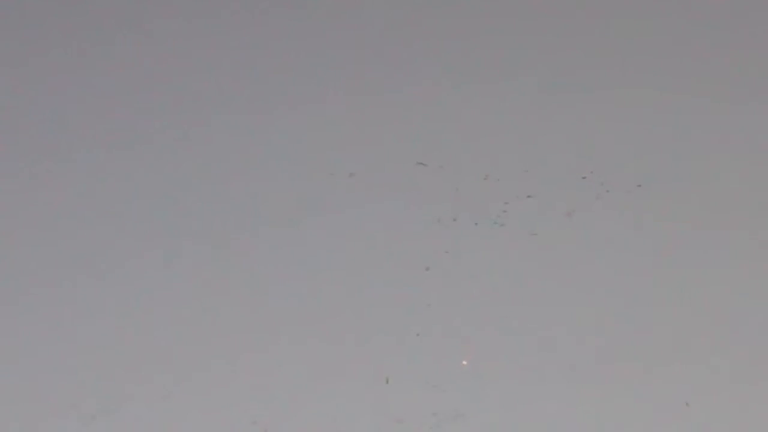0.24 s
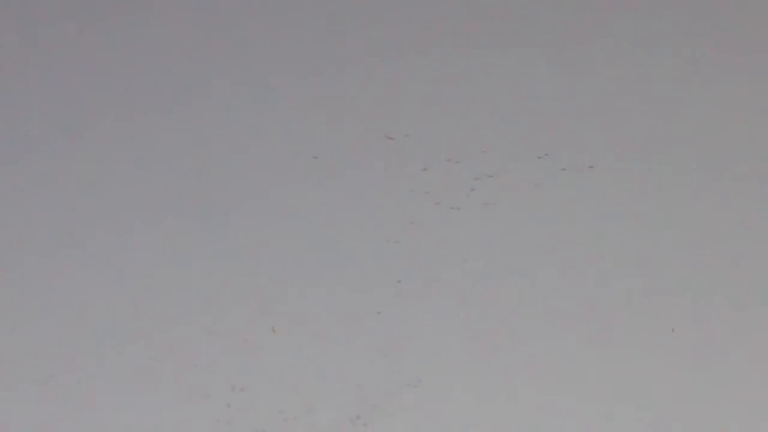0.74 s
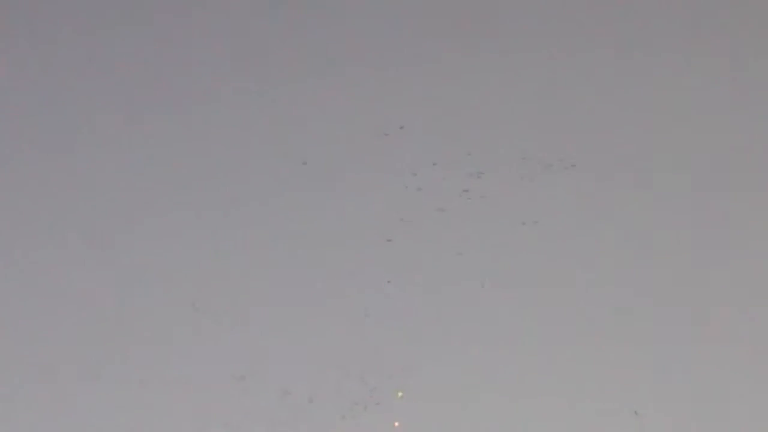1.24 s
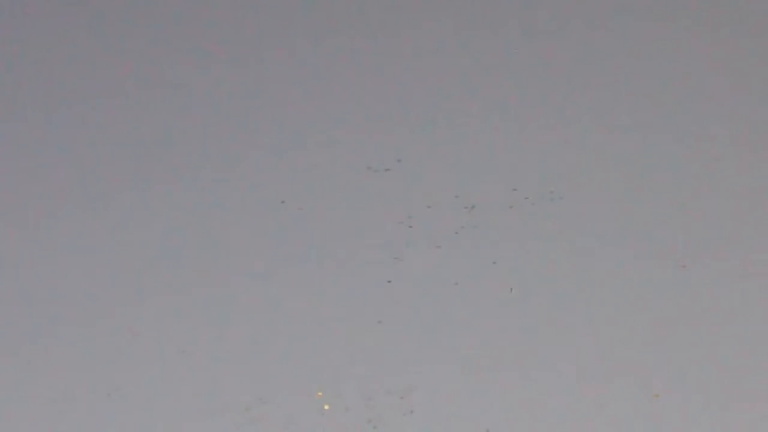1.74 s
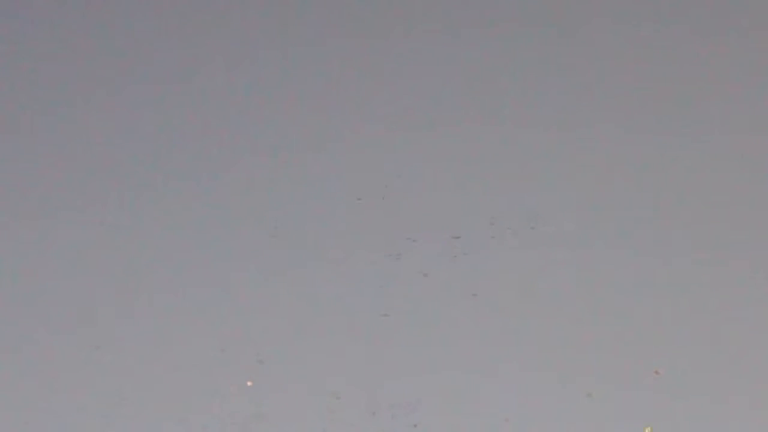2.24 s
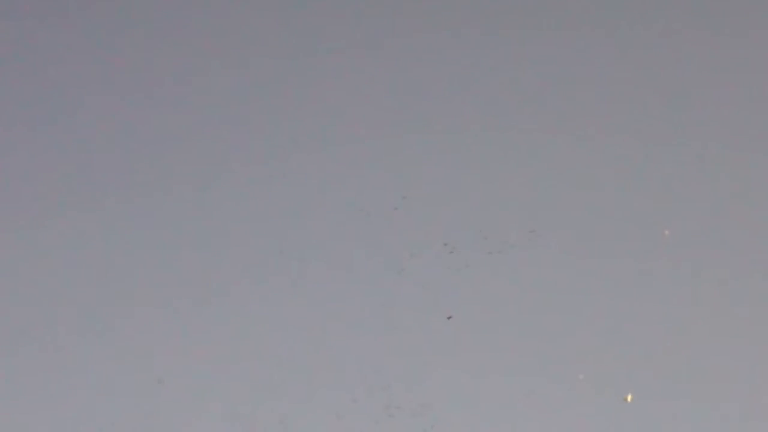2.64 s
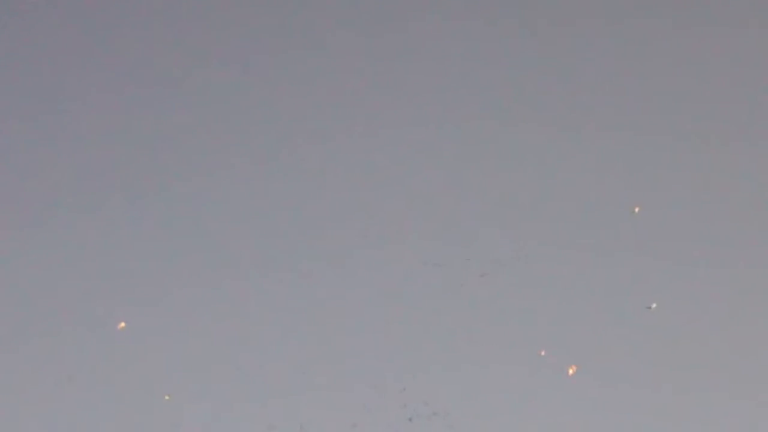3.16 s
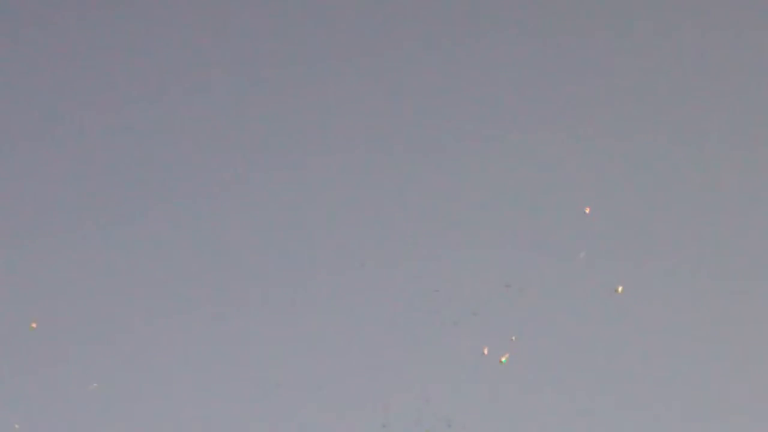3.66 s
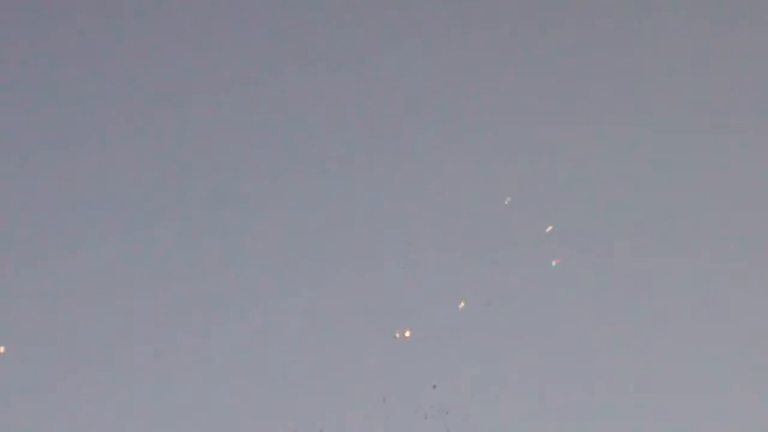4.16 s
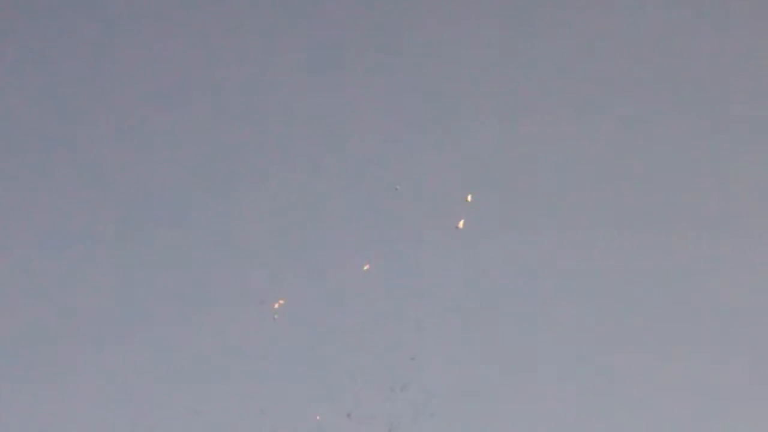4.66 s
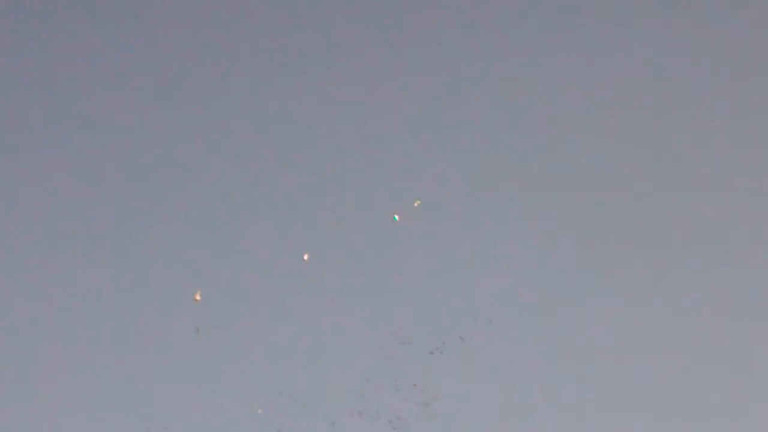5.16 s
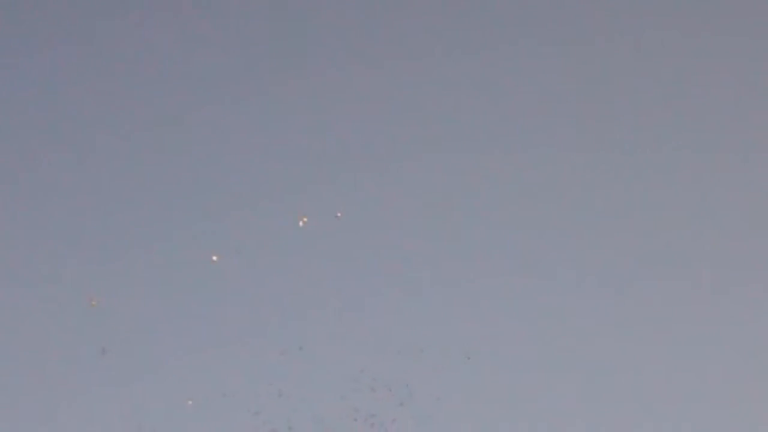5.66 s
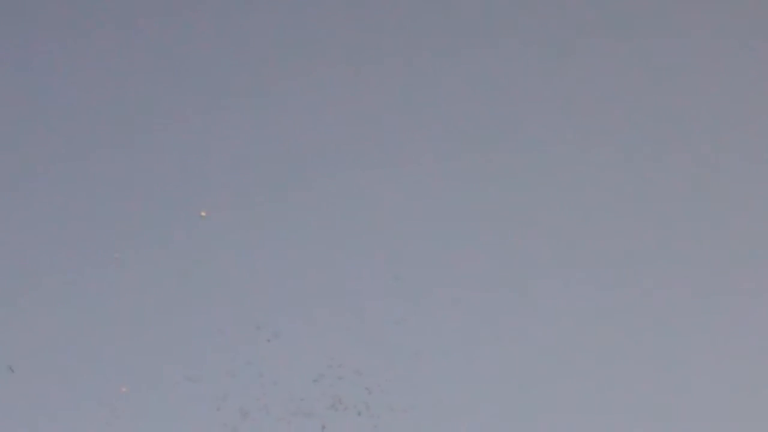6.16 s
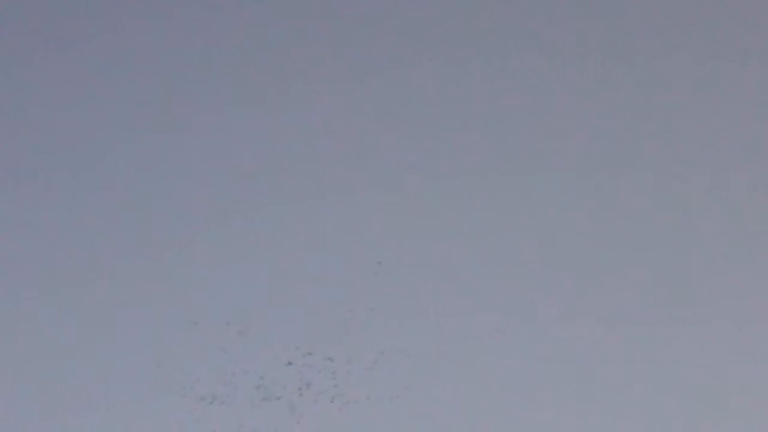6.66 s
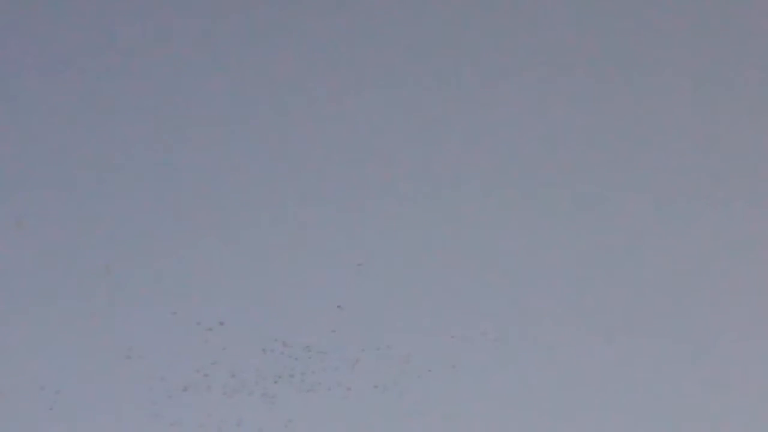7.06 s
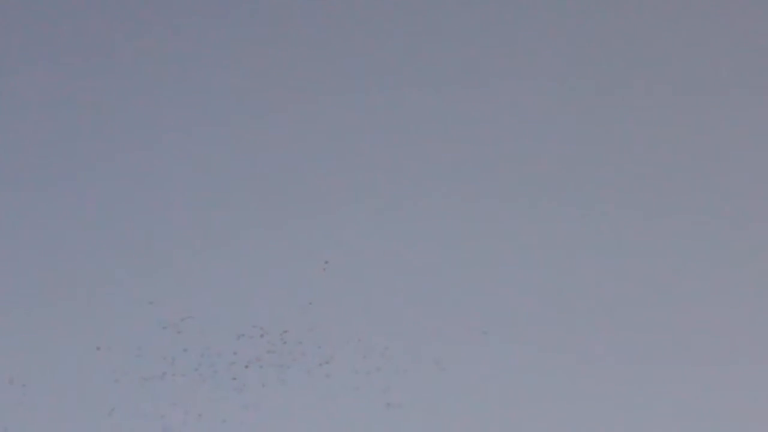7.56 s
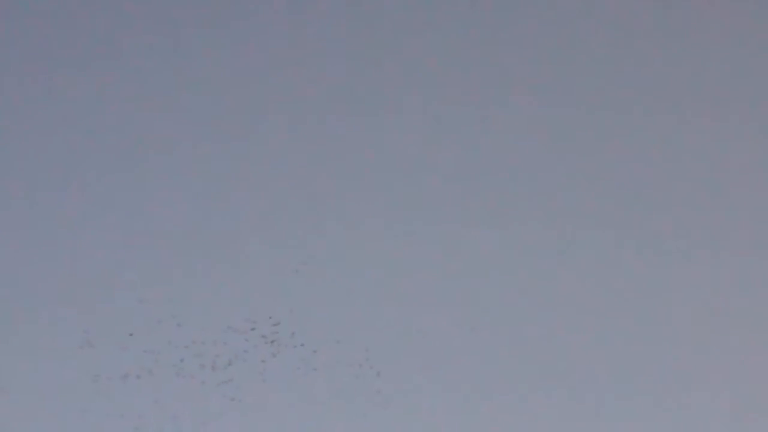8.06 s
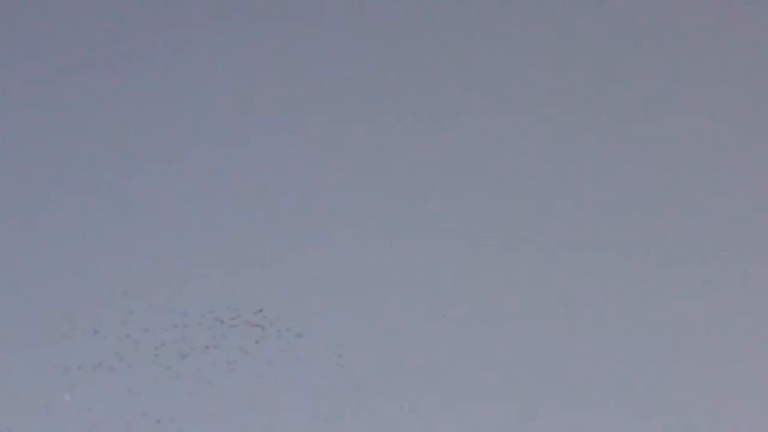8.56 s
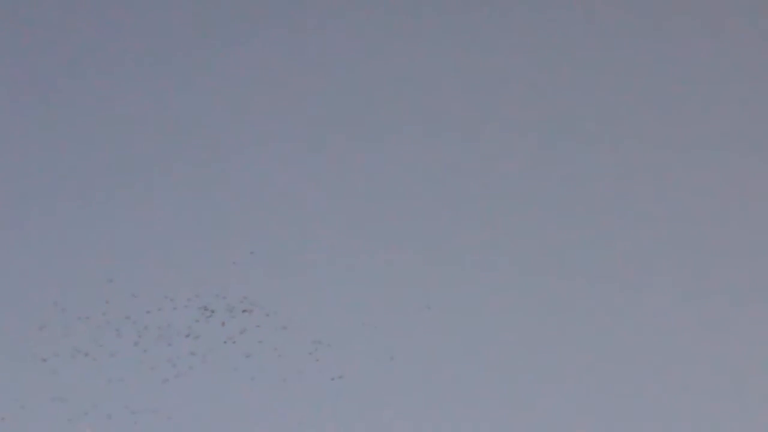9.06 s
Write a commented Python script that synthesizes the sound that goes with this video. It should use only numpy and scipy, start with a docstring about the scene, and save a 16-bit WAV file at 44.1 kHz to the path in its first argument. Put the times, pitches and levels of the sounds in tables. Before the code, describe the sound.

Outdoors, many crow-like birds call at once in flight, far away, with a few closer ones standing out in bright, rasping clacks. Short, high gull cries are scattered among them, busiest in the first half. The closer clacks then bunch up, and the chatter dips and returns. Soft distant traffic and a thin microphone hiss lie underneath, and the birds have a slight echo.

```python
"""Dusk over open ground. Distant traffic, microphone hiss and a far jackdaw flock sound throughout.
From 0.2 s gulls wail in clear notes that break between registers, the beak picking out harmonics.
From 0.4 s near jackdaws call 'tchack': a bright tone, then falling pulses that collapse into a rasp.
A thin far squeal sounds twice between 2 and 3 s. The near jackdaws crowd in around 7 s; a faint hum
follows at 7.8 s. Trees and walls echo the birds."""
import sys
import numpy as np
from scipy import signal
from scipy.fft import rfft, irfft, next_fast_len
from scipy.io import wavfile
from scipy.ndimage import map_coordinates

SR = 44100
rng = np.random.default_rng(int(sys.argv[2]) if len(sys.argv) > 2 else 0)


def bounce(signal):
    """Save signal as a 16-bit WAV file at the path given by the first command-line argument."""
    frames = np.transpose(np.atleast_2d(signal))
    limited = np.clip(frames, -1, 1)
    pcm = np.round(limited * 32767).astype(np.int16)
    wavfile.write(sys.argv[1], SR, pcm)


N = 410571

# traffic and air spectrum: freq_hz, relative_db
TRAFFIC_SPECTRUM = [(20, -17), (50, -5.5), (80, 1), (125, -5.5), (190, -5), (280, -1), (400, -5.5),
                    (600, -2.5), (1000, -3), (1600, -10.5), (2500, -16), (8000, -17.5)]
# left-right likeness of the traffic: freq_hz, coherence
TRAFFIC_COHERENCE = [(50, 1), (150, 0.85), (700, 0.82), (2000, 0.58), (6000, 0.014)]
# microphone hiss spectrum: freq_hz, relative_db
HISS_SPECTRUM = [(200, -47), (6000, -29), (9000, -1), (14000, 8)]
# jackdaw throat and beak response: freq_hz, relative_db
THROAT_RESPONSE = [(300, -65), (750, -13), (1170, 2), (1420, 0.5), (1800, 4), (2580, 3), (2950, -5.5),
                   (3800, -10), (5200, -11.5), (11000, -41)]
# far flock envelope: time_s, level_db
FAR_FLOCK_LEVEL = [(0.0, -38.5), (0.2, -41.5), (0.49, -39), (1.3, -41), (2.0, -41.5), (2.09, -45.5),
                   (2.18, -40.5), (2.85, -42), (3.3, -40), (3.6, -43.5), (3.87, -48), (3.98, -41),
                   (4.239, -44), (4.48, -44), (4.6, -41.5), (5.2, -44.5), (6.4, -44), (7.0, -41),
                   (7.19, -41.5), (7.3, -39.5), (7.85, -44), (7.96, -53), (8.4, -48.5), (8.6, -55.5),
                   (8.87, -55), (9.07, -42), (9.3, -46)]
# gull notes, levels relative: start_s, length_s, pitch_hz, rise_ratio, end_sag_ratio,
# fundamental_db, second_harmonic_db, beak_hz, beak_db, harshness (0-1)
GULL_CRY_NOTES = [(0.175, 0.066, 1179, -0.056, 0.012, -59, -58, 4700, -52.5, 0.0),
                  (0.278, 0.061, 1166, -0.056, 0.014, -44.5, -58, 3500.0, -56, 0.2),
                  (0.33, 0.046, 1253, -0.054, 0.016, -49, -34, 3970, -45, 0.1),
                  (0.43, 0.16, 1240, -0.054, 0.053, -46.5, -50, 4860, -48, 0.0),
                  (0.554, 0.13, 1105, -0.26, 0.02, -48.5, -50, 4370, -76, 0.0),
                  (1.173, 0.027, 1137, 0.011, 0.02, -50, -36, 4000, -45.5, 0.6),
                  (1.196, 0.038, 1420, 0.0041, 0.034, -47.5, -34.5, 5130, -43.5, 0.2),
                  (1.233, 0.037, 1240, 0.00092, 0.025, -50, -37, 5370, -48, 1),
                  (1.491, 0.087, 1422, 0.04, 0.013, -50, -48.5, 5140, -49.5, 0.18),
                  (1.572, 0.066, 1528, -0.00031, 0.043, -56, -43, 6000, -49.5, 0.3),
                  (1.677, 0.18, 1137, -0.096, 0.01, -49, -50.5, 4470, -52, 0.46),
                  (1.88, 0.11, 1370, -0.093, -0.00083, -54, -51, 4460, -44.5, 0.13),
                  (1.963, 0.16, 1320, -0.086, 0.039, -56, -50, 5200, -52.5, 0.0),
                  (2.242, 0.085, 1407, -0.031, 0.023, -49, -39.5, 4600, -49, 0.0),
                  (2.551, 0.23, 1310, -0.048, 0.036, -50, -50, 5100, -50, 0.17),
                  (2.962, 0.066, 1173, -0.042, 0.015, -55, -38.5, 3500, -42, 0.0),
                  (3.026, 0.033, 1325, -0.027, 0.02, -54, -40, 4300, -39, 0),
                  (3.187, 0.14, 1338, 0.0037, 0.0088, -46.5, -46.5, 4700, -48, 0.3),
                  (3.188, 0.23, 1154, -0.0038, 0.047, -61, -52, 4400, -51.5, 0.0),
                  (3.278, 0.075, 1302, 0.056, 0.0047, -65, -41, 5230, -50, 0.7),
                  (3.328, 0.099, 1354, -0.055, 0.027, -44, -51, 4550, -48.5, 0.5),
                  (3.446, 0.032, 1180, 0.0014, 0.038, -67.0, -66.0, 4640, -52.5, 0.1),
                  (3.526, 0.1, 1023, -0.064, 0.01, -40.5, -72, 4830, -51.5, 0.44),
                  (3.554, 0.086, 1300, 0.025, 0.046, -57, -49, 5060, -53.5, 0),
                  (3.743, 0.045, 1217, 0.02, 0.019, -55, -36.5, 3800, -40.5, 0.24),
                  (3.781, 0.047, 1384, -0.036, 0.015, -48.5, -44, 4700, -48, 0.3),
                  (3.82, 0.095, 1280, 0.02, -0.0085, -72, -49.5, 4600.0, -49, 0.0),
                  (3.914, 0.16, 1276, -0.061, 0.022, -55, -55, 4870, -57, 0.54),
                  (4.536, 0.072, 1250, 0.014, 0.011, -57, -54, 5000.0, -53, 0.0),
                  (4.599, 0.088, 1229, -0.046, 0.03, -53.5, -39.5, 3500, -44.5, 0.33),
                  (4.681, 0.049, 1340, -0.04, 0.032, -58, -45.5, 4900.0, -49.5, 0.4),
                  (4.926, 0.12, 1143, -0.087, 0.029, -58, -58, 4500, -55.5, 0),
                  (5.326, 0.14, 1271, 0.01, 0.034, -61, -51, 4600, -56, 0.36),
                  (5.784, 0.047, 1163, 0.007, 0.0073, -51.5, -36, 3560, -42, 0.22),
                  (5.824, 0.069, 1348, 0.00052, 0.031, -49, -43, 4600, -45.5, 0),
                  (5.885, 0.079, 1555, 0.0082, 0.004, -47.5, -68, 5600.0, -64, 0.0),
                  (6.048, 0.06, 980, 0.0079, -0.0016, -64, -39.5, 3940, -56, 0.6),
                  (6.105, 0.069, 1118, 0.062, 0.017, -48, -43.5, 4370, -54, 0.5),
                  (6.248, 0.072, 1212, -0.039, 0.019, -58, -43.5, 4170, -49, 0.2),
                  (6.755, 0.061, 1177, -0.063, -0.00053, -61, -38, 3850, -45, 0.14),
                  (7.25, 0.105, 1580, 0.125, 0.033, -68, -43, 6050, -54, 0.0),
                  (7.452, 0.044, 1340, -0.034, 0.018, -56, -45.5, 4500, -50, 0.24),
                  (8.08, 0.13, 1150, -0.025, 0.011, -61.5, -55, 4400, -60, 0.0),
                  (8.329, 0.032, 1240, 0.12, -0.0091, -68, -51, 3700, -63, 0.2),
                  (8.353, 0.044, 1150, -0.078, -0.018, -59, -34, 3470, -48, 0.3),
                  (8.399, 0.058, 1102, 0.052, -0.0069, -58, -40, 3180, -45, 0.74),
                  (8.454, 0.036, 1266, 0.032, 0.0063, -55, -41.5, 4340, -51, 0),
                  (9.115, 0.081, 1160, 0.012, 0.047, -56, -45.5, 3450, -50, 0.1),
                  (9.217, 0.053, 1170, -0.0092, 0.059, -63, -65, 4060, -54, 0.3)]
# near jackdaws, levels relative: start_s, head_hz, head_db, rasp_db, rasp_length_s
NEAR_CALLS = [(.404, 2425, -31, -40.5, 0.075), (.515, 2424, -38, -46, 0.076),
              (.85, 2290, -48, -43.5, 0.067), (3.127, 2580, -39, -48.5, .11),
              (3.682, 2590, -41, -47, 0.042), (3.92, 2534, -42, -45, 0.054),
              (4.105, 2487, -40.5, -48, 0.11), (4.304, 2500, -41, -49, 0.1), (4.355, 2406, -43, -47, 0.087),
              (5.004, 2780, -42, -42, .055), (5.15, 2340, -44, -59, 0.059), (5.44, 2520, -46, -49, 0.1),
              (5.645, 2460, -41, -50, 0.062), (5.99, 2523, -45, -41, 0.15), (6.148, 2296, -45, -45.5, .06),
              (6.27, 2490, -42, -43.5, 0.076), (6.43, 2603, -35.5, -47.5, 0.11),
              (6.544, 2390, -41, -43.5, 0.072), (6.622, 2320, -38, -50, 0.057),
              (6.685, 2364, -39, -45, 0.088), (6.825, 2400, -35, -45.5, 0.064),
              (6.86, 2510, -38, -53, 0.05), (6.942, 2574, -33, -41.5, 0.065), (7.005, 2400, -38, -43, .11),
              (7.082, 2700, -34.5, -52, .08), (7.236, 2240, -39, -45.5, 0.081),
              (7.465, 2400, -43, -62, 0.054), (7.516, 2410, -37.5, -45, .085),
              (7.697, 2410, -44, -49, 0.055), (7.781, 2160, -46, -49.5, 0.12),
              (7.968, 2330, -47.5, -55, .05), (8.235, 1900, -48, -54, 0.052),
              (8.678, 2710, -38.5, -52, 0.049), (8.716, 2640, -43, -47.5, 0.11),
              (8.883, 2400, -42.5, -53.5, 0.067), (8.944, 2680, -42, -46.5, .11),
              (9.232, 2530, -35.5, -65, 0.045)]
# far squeals and hum: start_s, length_s, pitch_hz, level_db
SQUEALS_AND_HUM = [(2.05, 0.3, 2955, -46), (2.42, 0.36, 2904, -47.5), (7.8, 0.97, 513, -59)]
# echo decay: freq_hz, t60_s
ECHO_DECAY = [(500, 0.78), (2500, 0.51), (6000, 1)]
# the camera body delays the right microphone port: freq_hz, left_lead_rad
PORT_LEAD = [(800, 0.091), (1500, 0.76), (2700, 1.43), (3600, 1.4), (4400, 0.9)]

GLIDE_S = .04  # slide at a gull note's free end


def amp(db):
    """Decibels to amplitude."""
    return 10 ** (np.asarray(db) / 20)


def unit(x):
    """Scale to unit RMS."""
    return x / np.sqrt(np.mean(x ** 2) + 1e-20)


def along(points, hz):
    """Interpolate (freq_hz, value) points on a log axis."""
    freqs_hz, values = np.transpose(points)
    return np.interp(np.log(hz + 1), np.log(freqs_hz + 1), values)


def wobble(rate_hz, size):
    """Smooth random curve, rate_hz knots a second."""
    return map_coordinates(rng.standard_normal(480), [np.arange(size) * rate_hz / SR], mode="mirror")


def filtered(x, response):
    """Apply a frequency response."""
    size = next_fast_len(N + SR // 2)
    return irfft(rfft(x, size) * response(np.fft.rfftfreq(size, 1 / SR)), size)[..., :N]


def causal(gain):
    """Minimum-phase response: a body rings only after it is excited."""
    cepstrum = irfft(np.log(gain))
    half = len(cepstrum) // 2
    return np.exp(rfft(np.r_[cepstrum[0], 2 * cepstrum[1:half]], len(cepstrum)))


def fade(t, length, rise, fall):
    """Quarter-sine attack and release."""
    attack = np.sin(np.pi / 2 * np.clip(t / rise, 0, 1))
    return attack * np.sin(np.pi / 2 * np.clip((length - t) / fall, 0, 1))


def place(out, start_s, x, pan_db, lead_samples):
    """Mix in a sound; positive pan and lead make the left louder and earlier."""
    for channel, sign in zip(out, (1, -1)):
        start = max(round(start_s * SR - sign * lead_samples / 2), 0)
        part = channel[start:start + len(x)]
        part += amp(sign * pan_db / 2) * x[:len(part)]


def traffic(level_db=-49.5, drift_db=1.12):
    """Distant traffic: drifting noise, its bass nearly alike at both ports."""
    def mid_side_gain(hz):
        angle_rad = np.arccos(np.clip(along(TRAFFIC_COHERENCE, hz), -1, 1)) / 2
        return amp(along(TRAFFIC_SPECTRUM, hz)) * [np.cos(angle_rad), np.sin(angle_rad)]
    mid, side = filtered(rng.standard_normal((2, N)), mid_side_gain)
    return amp(level_db + drift_db * wobble(2.216, N)) * unit(np.array([mid + side, mid - side]))


def microphone_hiss(level_db=-59.5):
    """Each port's own noise."""
    hiss = filtered(rng.standard_normal((2, N)), lambda hz: amp(along(HISS_SPECTRUM, hz)))
    return amp(level_db) * unit(hiss)


def jackdaw_head(head_hz, nominal_s=.02236, overtone_db=-17):
    """The short, bright, drooping tone that opens a 'tchack'."""
    size = int(2 * nominal_s * SR)
    progress = np.arange(size) / SR / (nominal_s * rng.uniform(.7, 1.3))
    droop = rng.uniform(.04, .21)
    pitch_hz = head_hz * (1 + droop * (.4 - progress) + .025 * wobble(500, size))
    phase = 2 * np.pi * np.cumsum(pitch_hz) / SR
    subharmonic = 2 * progress * np.sin(phase / 2)
    partials = subharmonic + wobble(250, size) * np.sin(1.5 * phase) + np.sin(2 * phase) / 2
    tone = np.sqrt(2) * (np.sin(phase) + amp(overtone_db) * partials)
    return tone * amp(2 * wobble(250, size)) * fade(progress, 1.3, .13, .75)


def jackdaw_rasp(head_hz, length_s, pulse_ratio=.33, breath=.093):
    """The syrinx drops to slower pulses that fall steeply, level off and break up."""
    jitter, fall = rng.uniform(.06, .2), rng.uniform(.35, .85)
    t = np.arange(int(length_s * SR)) / SR
    progress = t / length_s
    onset_hz = head_hz * pulse_ratio * rng.uniform(.8, 1.25)
    wander = jitter * progress ** 1.5 * wobble(600, len(t))
    rate_hz = onset_hz * np.exp(wander - fall * np.sin(np.pi / 2 * progress))
    from_pulse_samples = (np.cumsum(rate_hz) / SR % 1 - .5) * SR / rate_hz
    pulses = unit(np.exp(-from_pulse_samples ** 2))
    air = (breath + .3 * progress ** 2) * rng.standard_normal(SR // 2)[:len(t)]
    voice = unit((pulses + air) * amp(2.5 * wobble(160, len(t))))
    return voice * fade(t, length_s, .25 * length_s, .35 * length_s)


def bounced(x, gain, count=4, longest_s=.007):
    """Early reflections off ground and walls, different for every call."""
    paths = np.zeros(int(longest_s * SR))
    paths[0] = 1
    paths[rng.integers(len(paths) // 10, len(paths), count)] = gain
    return signal.fftconvolve(x, paths / np.linalg.norm(paths))


def flock(calls, pan_db, spread_samples):
    """Jackdaws, each in its own direction; the rasps ring in the throat."""
    heads, rasps = np.zeros((2, 2, N))
    directions = rng.standard_normal((len(calls), 2)) * [2, spread_samples] + [pan_db, 0]
    for (start_s, head_hz, head_db, rasp_db, length_s), direction in zip(calls, directions):
        head, rasp = jackdaw_head(head_hz), jackdaw_rasp(head_hz, length_s)
        place(heads, start_s, amp(head_db) * bounced(head, gain=.1), *direction)
        place(rasps, start_s, amp(rasp_db) * bounced(rasp, gain=.35), *direction)
    return heads + filtered(rasps, lambda hz: causal(unit(amp(along(THROAT_RESPONSE, hz)))))


def far_jackdaws(count=380, head_over_rasp_db=2.5, shelf_hz=2900, treble_db=-6):
    """Random calls, swelling and fading, dulled and smeared into a wash by distance."""
    timing, pitch, nearness, stretch = rng.standard_normal((count, 4)).T
    start_s = (np.arange(count) + timing / 2) / count * N / SR
    head_hz = 2180 * np.exp(.15 * np.clip(pitch, -2, 1))
    rasp_db = 3.5 * np.clip(nearness, -2, .5)
    length_s = .065 * np.exp(stretch / 10)
    calls = np.column_stack([start_s, head_hz, rasp_db + head_over_rasp_db, rasp_db, length_s])
    babble = flock(calls, pan_db=.9, spread_samples=3.6)
    babble = filtered(babble, lambda hz: amp(treble_db * (1 - 1 / (1 + (hz / shelf_hz) ** 20))))
    level_db = np.interp(np.arange(N) / SR, *np.transpose(FAR_FLOCK_LEVEL))
    return amp(level_db) * unit(babble + amp(-6) * echoes(babble))


def gull_note(length_s, mid_hz, rise, sag, first_db, second_db, beak_hz, beak_db, harshness,
              lead_s, trail_s, harmonics=6, flutter_db=2, edge_s=.004):
    """A pitch arch whose upper harmonics glide through the beak resonance; harsh notes double the period."""
    def beak_level_db(hz, width_hz=700, valley_db=10, tilt_db_per_hz=.0024):
        offset_hz = hz - beak_hz
        off_peak = 1 - np.exp(-(offset_hz / width_hz) ** 2)
        return beak_db - valley_db * off_peak - tilt_db_per_hz * offset_hz
    total_s = lead_s + length_s + trail_s
    size = int(total_s * SR)
    t = np.arange(size) / SR - lead_s
    from_mid = np.clip(t / length_s, 0, 1) - .5
    slack = (np.maximum(-t, 0) + np.maximum(t - length_s, 0)) / GLIDE_S  # 0 inside the note
    pitch_hz = mid_hz * (1 + rise * from_mid - sag * (2 * from_mid) ** 2) * (1 - .2 * slack ** 1.15)
    waver = 1 + .0045 * wobble(74.4, size) + .0073 * wobble(904, size)
    phase = 2 * np.pi * np.cumsum(pitch_hz * waver) / SR
    note = np.zeros(size)
    for k in range(1, harmonics + 1):
        upper_db = beak_level_db(k * pitch_hz) + 2.5 * wobble(20, size) - 1
        harmonic_db = {1: first_db, 2: second_db}.get(k, upper_db)
        grain = 1 + (.14 + .3 * harshness) * min(k / harmonics * 2, 1) * wobble(1200, size)
        note += amp(harmonic_db + flutter_db * wobble(51.8, size)) * grain * np.sin(k * phase)
        between_db = beak_level_db((k + .5) * pitch_hz) + flutter_db * wobble(102, size)
        note += harshness * amp(between_db) * np.sin((k + .5) * phase)
    pressure = amp(-15 * slack ** .65) * fade(t + lead_s, total_s, edge_s, edge_s)
    return np.sqrt(2) * note * pressure


def gulls(gain_db=2, air_cutoff_hz=7100, pan_db=2, spread_samples=1.4, join_s=.009, overlap_s=.0015):
    """Cries slide in and out; abutting notes break between registers. Air absorbs the top harmonics."""
    def slide_s(gaps_s):
        return overlap_s if np.abs(gaps_s).min() < join_s else GLIDE_S
    out = np.zeros((2, N))
    starts_s, lengths_s = np.transpose(GULL_CRY_NOTES)[:2]
    directions = rng.standard_normal((len(starts_s), 2)) * [1, spread_samples] + [pan_db, 0]
    for (start_s, length_s, *voice), direction in zip(GULL_CRY_NOTES, directions):
        lead_s = slide_s(starts_s + lengths_s - start_s)
        trail_s = slide_s(starts_s - start_s - length_s)
        place(out, start_s - lead_s, gull_note(length_s, *voice, lead_s, trail_s), *direction)
    return amp(gain_db) * filtered(out, lambda hz: 1 / np.sqrt(1 + (hz / air_cutoff_hz) ** 20))


def near_jackdaws():
    """The birds that stand out from the flock."""
    return flock(NEAR_CALLS, pan_db=1.5, spread_samples=1.4)


def far_tones(waver=.0061, flutter_db=3):
    """Two thin squeals, later a low hum: wavering tones from far away."""
    out = np.zeros((2, N))
    for start_s, length_s, pitch_hz, level_db in SQUEALS_AND_HUM:
        t = np.arange(int(length_s * SR)) / SR
        tone = np.sin(2 * np.pi * np.cumsum(pitch_hz * (1 + waver * wobble(152, len(t)))) / SR)
        tone *= amp(level_db + flutter_db * wobble(20, len(t)))
        tone *= fade(t, length_s, length_s / 3, length_s / 2)
        place(out, start_s, tone, pan_db=1, lead_samples=0)
    return out


def echoes(x):
    """Trees and walls scatter the calls back after 20 ms; the tail is shortest near 2.5 kHz."""
    hz, t, spectra = signal.stft(rng.standard_normal((2, SR)), SR, nperseg=256)
    decay = amp(-60 * t / along(ECHO_DECAY, hz)[:, None])
    tail = signal.istft(spectra * decay, SR, nperseg=256)[1]
    tail = np.pad(tail / np.linalg.norm(tail[0]), ((0, 0), (SR // 50, 0)))
    return signal.fftconvolve(x, tail, axes=1)[:, :N]


def scene():
    """Birds and their echoes over far tones, traffic and hiss."""
    birds = gulls() + near_jackdaws() + far_jackdaws()
    birds = filtered(birds, lambda hz: np.exp(np.outer([.5j, -.5j], along(PORT_LEAD, hz))))
    return birds + amp(-15) * echoes(birds) + far_tones() + traffic() + microphone_hiss()


def record(dry):
    """The camera passes nothing above its band limit."""
    limit_hz = 14270
    return filtered(dry, lambda hz: hz < limit_hz)


dry = scene()
out = record(dry)
bounce(out)
```